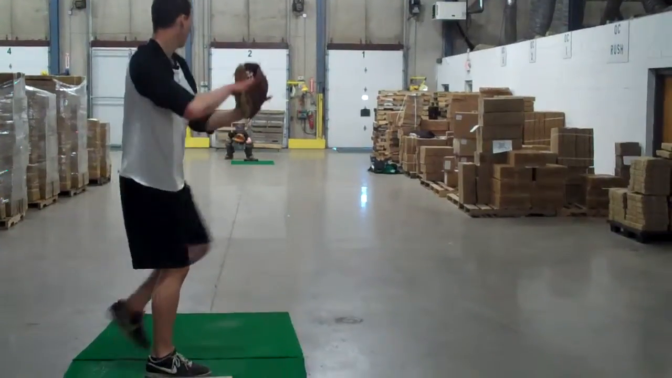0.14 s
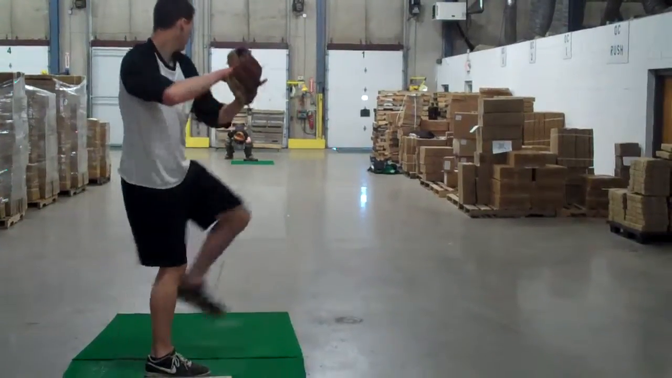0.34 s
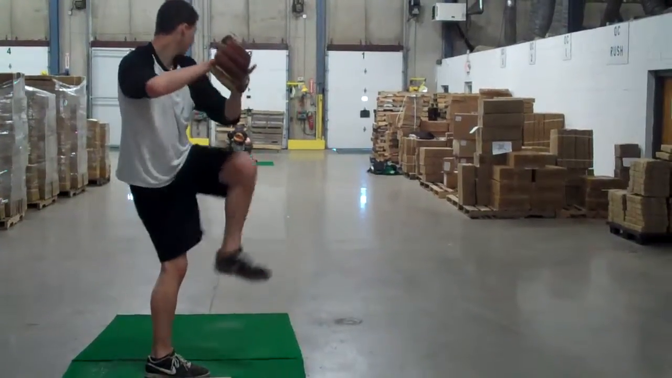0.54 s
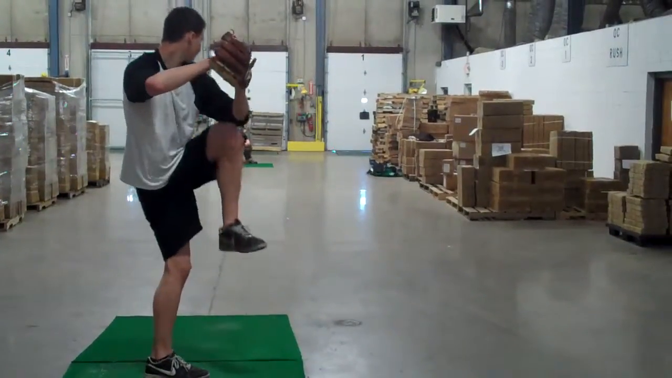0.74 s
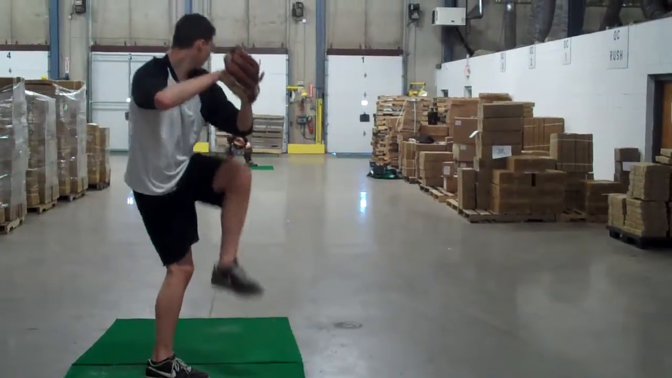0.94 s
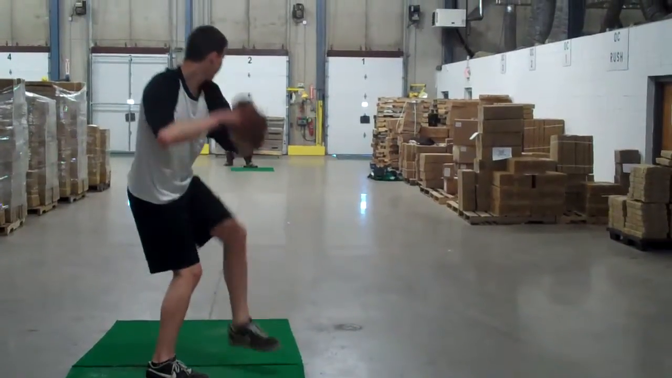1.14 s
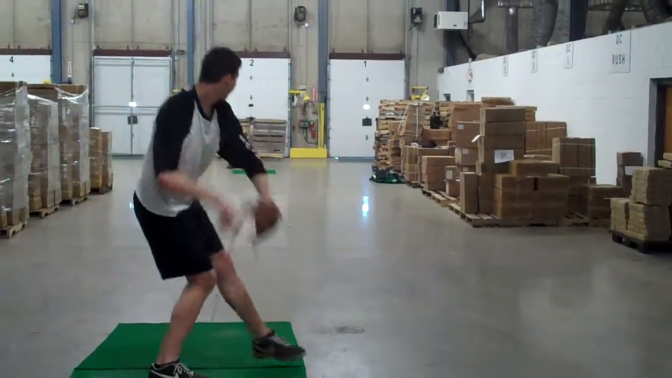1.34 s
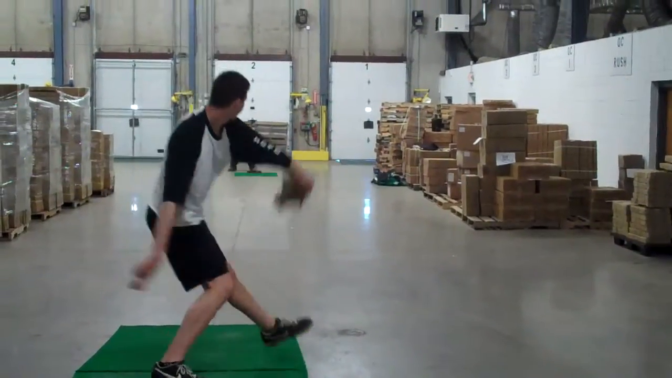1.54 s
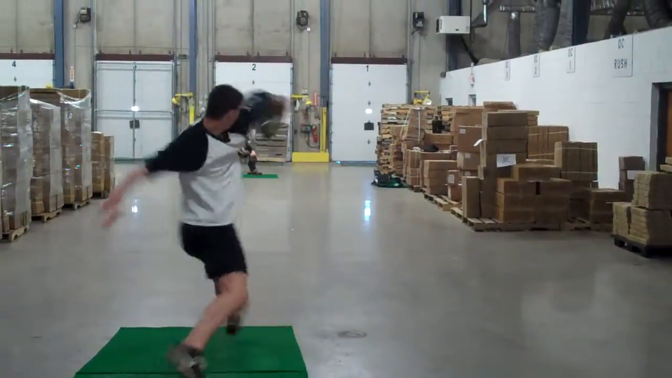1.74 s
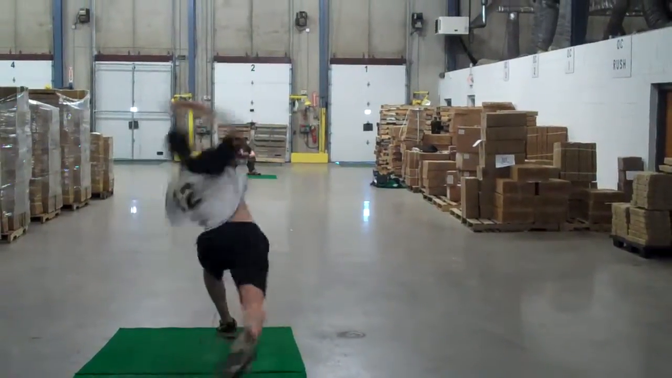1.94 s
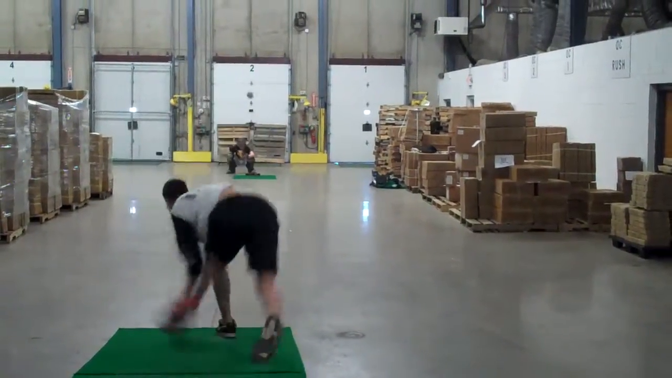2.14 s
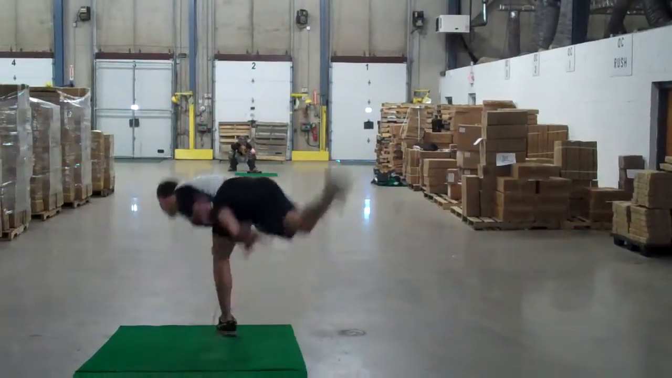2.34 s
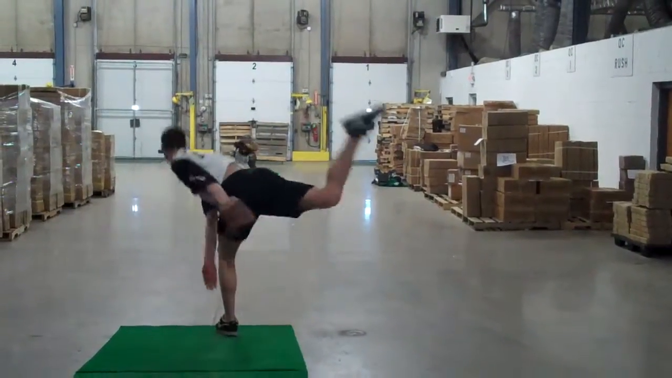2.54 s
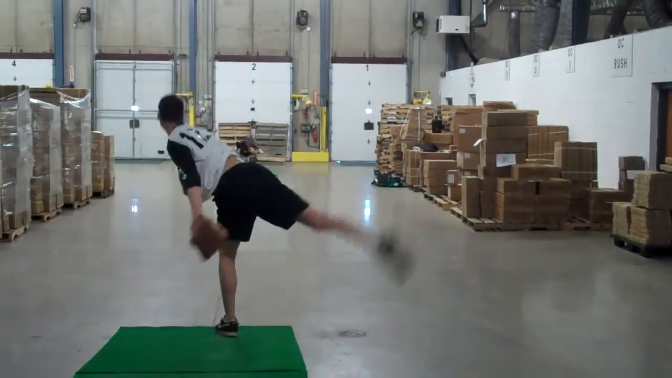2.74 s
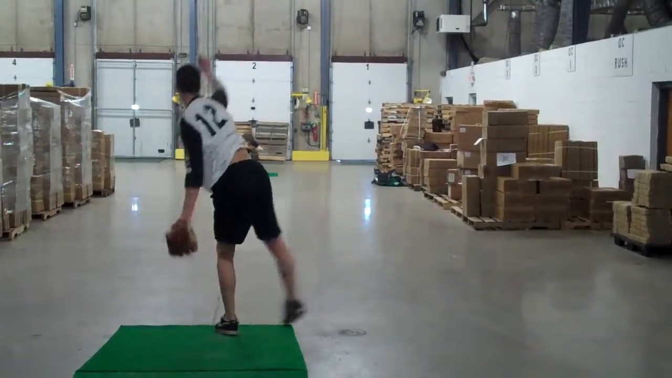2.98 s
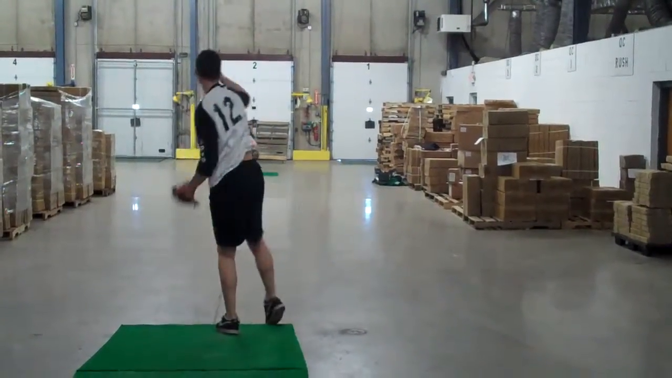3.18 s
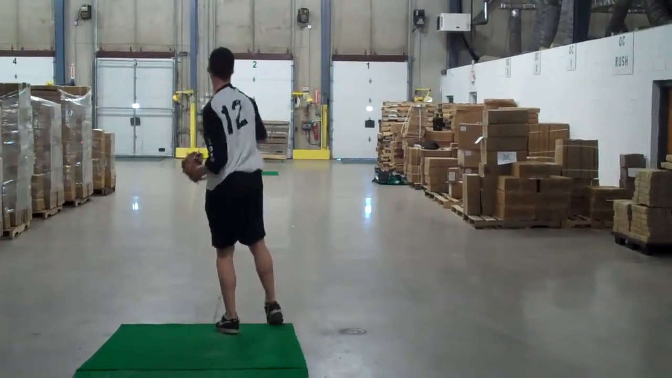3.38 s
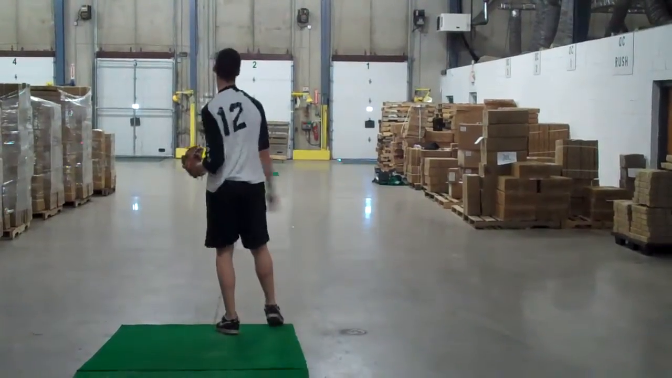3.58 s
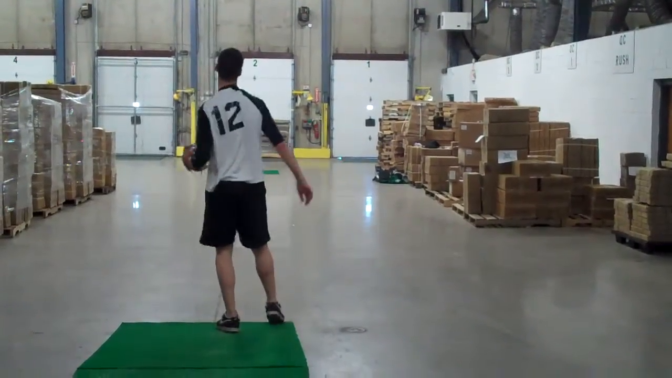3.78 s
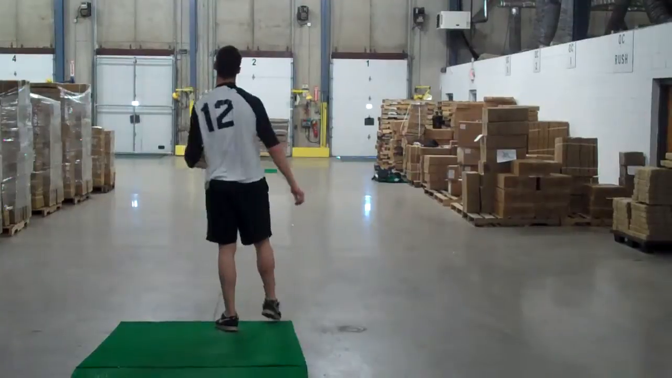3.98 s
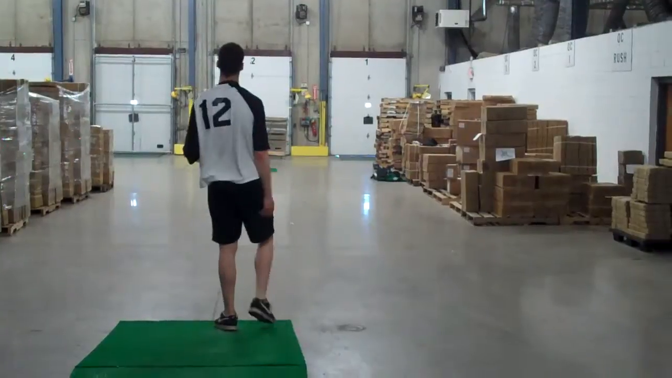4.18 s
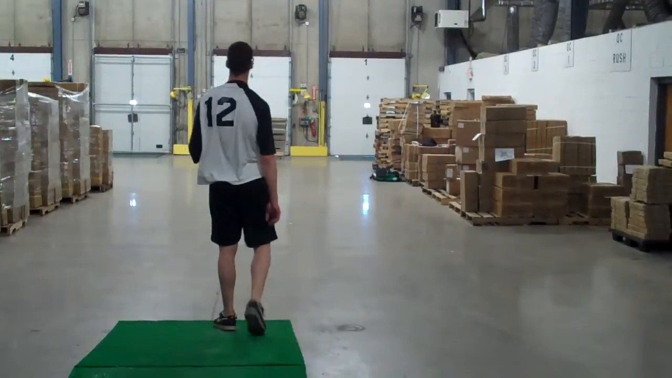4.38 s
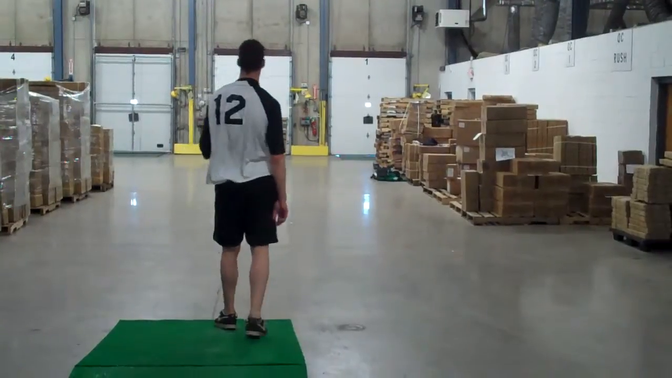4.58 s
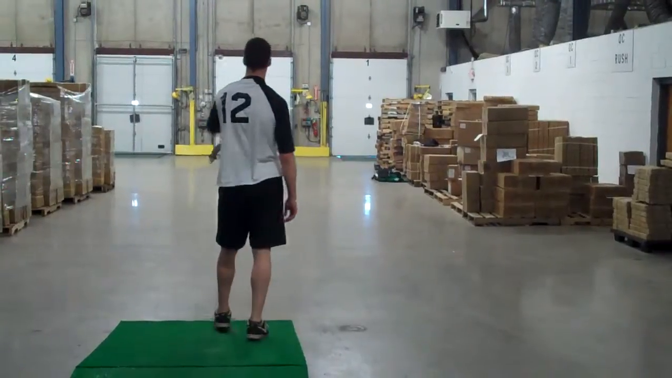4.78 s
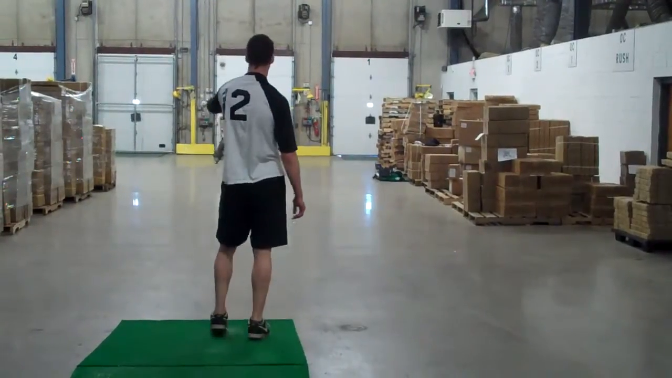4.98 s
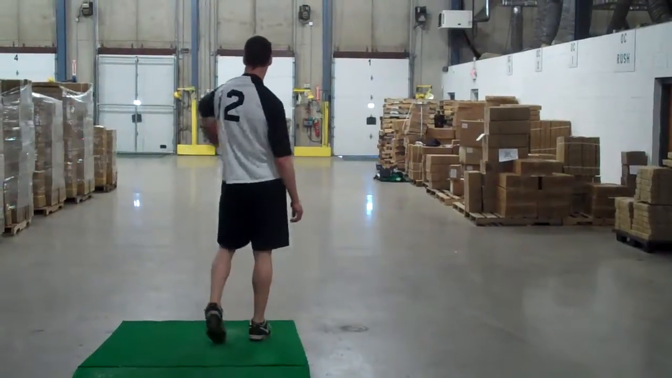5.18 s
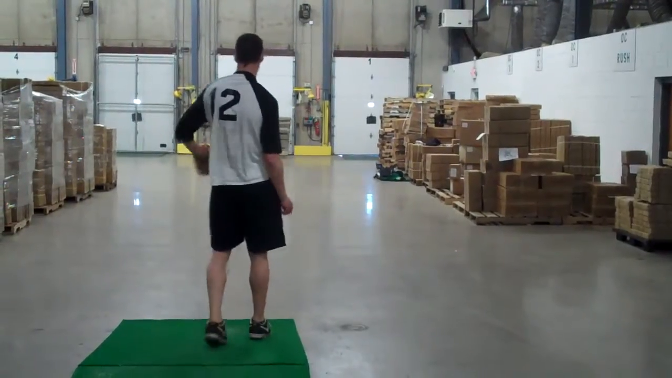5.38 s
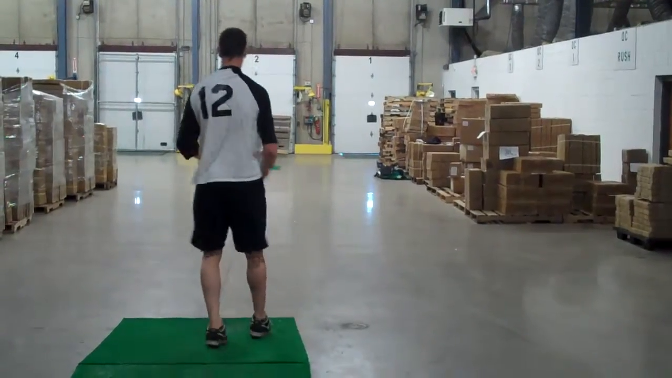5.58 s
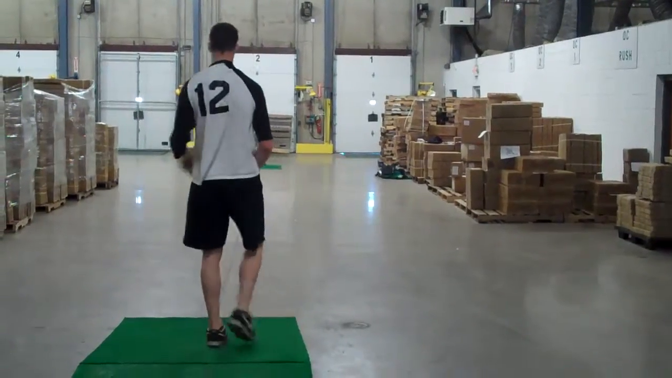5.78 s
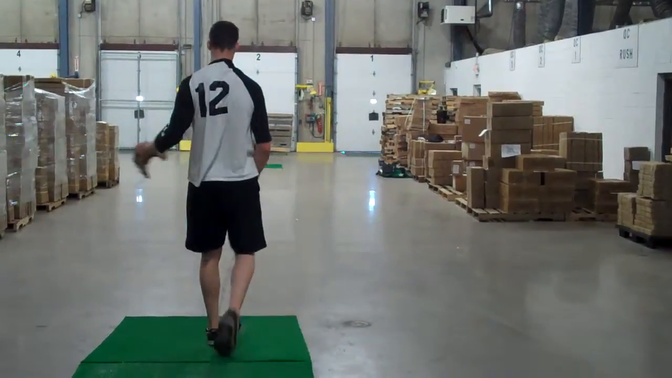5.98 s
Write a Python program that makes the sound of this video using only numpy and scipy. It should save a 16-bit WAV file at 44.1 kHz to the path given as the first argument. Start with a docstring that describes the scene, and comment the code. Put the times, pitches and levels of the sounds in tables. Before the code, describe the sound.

Quiet room hum and duct air, heard on a simple microphone near a thrower. A few small taps and tiny metallic clinks, then a quick burst of rustling clothes, dragging soles and a soft hollow footfall. Almost a second later comes a sharp, overloaded leather pop with thick hall reverberation. The background dips briefly and returns; finally a second, gentler glove slap echoes, ending with a dull step.

```python
"""In a large warehouse a pitcher throws from a portable mound: clothes swish, soles scuff, the stride thumps.
The ball pops into the catcher's mitt, loud enough to overload the microphone; the return smacks into his own glove.
Leather is damped sines plus a noise crack. Floor, stacked boxes and walls return echoes, and the hall rings on
as noise dying band by band. Light taps and clinks are close; mains hum and ventilation lie behind."""
import sys
import numpy as np
from scipy import signal
from scipy.fft import rfft, irfft, next_fast_len
from scipy.io import wavfile

SR = 44100
rng = np.random.default_rng(int(sys.argv[2]) if len(sys.argv) > 2 else 0)


def log_audio(samples):
    """Write samples as a 16-bit WAV file to the path given in sys.argv[1]."""
    # one column per channel
    frames = np.atleast_2d(samples).T
    # limit to full scale, then quantise
    limited = np.clip(frames, -1, 1)
    pcm = np.round(limited * 32767).astype(np.int16)
    wavfile.write(sys.argv[1], SR, pcm)


N = 265477


def pops():
    """Pitch into the mitt, return into the glove; pallets behind the catcher answer the mitt at once, the glove late."""
    # leather pocket resonances: pitch_hz, level_db (relative), t60_s
    mitt_modes = [(79.5, -22, 0.1), (277, -17, 0.034), (483, -9.5, 0.0077), (1027, 1.5, 0.013),
                  (2960, -6.5, .006), (4020, -3.5, 0.01), (7530, -8, 0.0032)]
    glove_modes = [(404, -35, 0.026), (580, -16.5, 0.025), (857, -9, 0.033), (1410, -21, 0.012),
                   (3560, -21, 0.018), (5500, -30, 0.0059)]
    # colour of the leather's crack: frequency_hz, level_db (relative, per Hz)
    mitt_crack = [(88, -40), (150, -7), (431, -9.5), (1040, -6), (1210, -11), (1500, -2), (1830, -16.5),
                  (3160, -7), (6260, -19.5), (7180, -22), (12700, -40), (16000, -56)]
    glove_crack = [(150, -32), (250, -10), (968, -2.5), (2360, -4.5), (3940, -2.5), (4370, -4.5),
                   (7060, -16), (7690, -15), (11800, -25), (15000, -67)]
    # colour of what the hall gives back: frequency_hz, level_db (relative, per Hz)
    mitt_hall = [(100, -33), (190, -11.5), (250, -3.5), (390, -1), (680, -8.5), (960, -3.5), (1400, -4.5),
                 (1750, -8), (2200, -4.5), (3000, -10), (4100, -9.5), (6500, -18), (10500, -31),
                 (13500, -71)]
    glove_hall = [(120, -45), (200, -11.5), (329, -19), (373, -8), (504, -8.5), (561, 0), (707, 0),
                  (956, -2), (1160, -10.5), (1780, -2), (2020, -12.5), (2410, -6), (3890, -8.5),
                  (8980, -23), (14000, -47)]
    # echoes off floor, boxes and walls: delay_s, level_db, roughness of the face (0-1)
    mitt_echoes = [(.0072, -1, .9), (0.011, -2, 0.5), (.0145, 0.5, 0.47), (0.0358, -7, 0.08), (.045, -1, 0),
                   (.0702, -10.5, 0.01), (.52, -30.5, 0.3)]
    glove_echoes = [(.0195, 2.5, 0.01), (.032, -6, .02), (.076, -10, .03), (.1473, -5.5, 0.043)]

    pitch = catch(2.8658, mitt_echoes, mitt_modes, mitt_crack, pocket_db=1.5, crack_db=-4, crack_t60=0.018,
                  sink_s=.0002, bass_hz=116, echo_bass_hz=440, spread=0.41)
    pitch += wash(2.8785, mitt_crack, level_db=-10.0, t60=0.092, bass_hz=800, edge_hz=10000)
    pitch += reverberation(2.876, mitt_hall, level_db=-21, build_s=.005,
                           aisle_db=3, aisle_t60=0.82, clump_db=1.52)
    back = catch(5.3362, glove_echoes, glove_modes, glove_crack, pocket_db=-5.5, crack_db=-10, crack_t60=0.035,
                 sink_s=.0016, bass_hz=400, echo_bass_hz=380, spread=.45)
    back += wash(5.4755, glove_crack, level_db=-23, t60=0.55, bass_hz=330, edge_hz=4000)
    back += reverberation(5.353, glove_hall, level_db=-25.0, build_s=0.0015,
                          aisle_db=-2, aisle_t60=1.0, clump_db=1.0)
    return pitch + back


def catch(s, echoes, pocket, crack, pocket_db, crack_db, crack_t60, sink_s, bass_hz, echo_bass_hz, spread):
    """Leather cracks, the ball sinks in, the pocket rings; flat faces return the ring, rough ones scatter the crack."""
    # the longer its way, the duller and more smeared an echo; far_s is the delay over which this sets in
    far_s, near_edge_hz, far_edge_hz, smear_s = 0.023, 10000, 3500, 0.061
    out, t = np.zeros((2, N)), np.arange(SR // 4) / SR
    thud = ring(pocket, t)
    slap = noise(crack, len(t), spread) * dying(t, crack_t60)
    add(out, s, from_db(crack_db) * thin(dull(slap, near_edge_hz), bass_hz))
    add(out, s + sink_s, from_db(pocket_db) * thin(thud, bass_hz))
    for delay, db, rough in echoes:
        far = 1 - np.exp(-delay / far_s)
        scattered = noise(crack, len(t), spread) * dying(t, crack_t60 + smear_s * far ** 2)
        echo = np.sqrt(1 - rough) * thud + np.sqrt(rough) * scattered
        echo = thin(echo, echo_bass_hz)   # small faces reflect little bass
        edge_hz = near_edge_hz * (far_edge_hz / near_edge_hz) ** far
        add(out, s + delay, from_db(db) * dull(echo, edge_hz))
    return out


def wash(s, crack, level_db, t60, bass_hz, edge_hz):
    """A stack of pallets scatters the crack into a dense, decaying wash."""
    out, t = np.zeros((2, N)), np.arange(SR // 2) / SR
    scattered = noise(crack, len(t), spread=0.48) * dying(t, t60)
    add(out, s, from_db(level_db) * thin(dull(scattered, edge_hz), bass_hz))
    return out


def reverberation(s, spectrum, level_db, build_s, aisle_db, aisle_t60, clump_db):
    """Dense scatter from the nearby boxes fades fast and leaves the slow tail of the whole hall."""
    out, tail = np.zeros((2, N)), hall_tail(spectrum)
    t = np.arange(tail.shape[1]) / SR
    tail *= uneven(len(t), clump_db, rate_hz=70)   # reflections arrive in clumps
    build_up = 1 - np.exp(-t / build_s)
    aisle = 1 + from_db(aisle_db) * dying(t, aisle_t60)
    add(out, s, from_db(level_db) * tail * build_up * aisle)
    return out


def hall_tail(spectrum, size=2 ** 17, count=16):
    """Diffuse sound dying band by band, each at its own rate: the air takes the treble."""
    # how long the hall rings: frequency_hz, t60_s
    hall_t60 = [(120, 3.25), (250, 1.18), (500, 2), (1000, 2.49), (2000, 2.11), (4000, 1.43), (6500, 0.66),
                (12000, 0.51)]
    t, hz = np.arange(size) / SR, np.arange(size // 2 + 1) * SR / size
    field = rfft(noise(spectrum, size))
    centres = np.geomspace(100, 14000, count)
    # neighbouring bands crossfade, so their shares add up to one
    return sum(irfft(field * np.interp(hz, centres, share)) * dying(t, at_hz(hall_t60, centre))
               for centre, share in zip(centres, np.eye(count)))


def pitcher(wet_db=-12.02):
    """The small sounds of the throw and a faint, rough, distant squeak, with their share of the hall."""
    # the squeak's noise bands: pitch_hz, width_hz, level_db
    squeak = [(1490, 240, -54.5), (1920, 280, -53), (2520, 1100, -58)]
    dry = knocks() + rubbing()
    dry += swell(4.865, 0.067) * sum(from_db(db) * tone(hz, width) for hz, width, db in squeak)
    hall = hall_tail([(100, -3.5), (1500, 0), (5000, -5), (12000, -17)])
    hall *= from_db(wet_db) / np.sqrt(np.sum(hall[0] ** 2))   # level set by the left channel's energy
    return dry + signal.fftconvolve(dry.mean(axis=0)[None], hall, axes=1)[:, :N]


def knocks():
    """Light contacts, ringing metal and thumps on the hollow mound, and a dull step on the way back."""
    # light taps of ball, glove and shoes: start_s, level_db
    tap_times = [(.9048, -32.5), (1.0678, -45.5), (1.22, -48.5), (1.9138, -41), (1.9507, -35),
                 (1.9765, -36), (2.2226, -38.5), (3.9106, -47), (4.742, -44)]
    # a small metal thing, perhaps a necklace: start_s, level_db
    clinks = [(1.39, -55), (1.951, -50), (1.98, -41), (2.406, -57), (2.47, -54.5)]
    # its resonances: pitch_hz, level_db (relative), t60_s
    clink_modes = [(2760, 1, 0.19), (5180, 5, 0.044), (8500, 0.5, .045), (10000, -11, .06),
                   (12700, -9, .04)]
    # feet load the mound, heel low and toe higher: start_s, level_db, push_centre_hz
    footfalls = [(1.976, -33.5, 95), (2.085, -37.5, 99), (2.27, -34, 216)]
    # resonances of the hollow mound: pitch_hz, level_db (relative), t60_s
    mound = [(101, 0, 0.34), (168, 0, 0.27), (227.5, -5, 0.24), (306, -0.5, 0.13)]
    push_octaves, sole_s = 0.7, 0.0046   # breadth of a push; time over which a sole loads the board

    out, t = np.zeros((2, N)), np.arange(SR // 2) / SR
    for s, db in tap_times:
        t60 = 0.048 * 2 ** ((db + 29.5) / 16)   # a harder tap lasts longer: twice as long per 16 dB
        add(out, s, tap(db, t60, edge_hz=11500))
        add(out, s + .029, tap(db - 7.5, t60=0.1, edge_hz=2500))   # dull clatter off the boxes
    for s, db in clinks:
        edge_hz = 10000 * 2 ** ((db + 41.5) / 11)   # a harder clink is brighter: an octave per 11 dB
        add(out, s, from_db(db) * dull(ring(clink_modes, t), edge_hz))
    for s, db, push_hz in footfalls:
        board = sum(ring([mode], t) / (1 + (np.log2(mode[0] / push_hz) / push_octaves) ** 4)
                    for mode in mound)
        add(out, s, from_db(db) * board * (1 - np.exp(-t / sole_s)))   # a soft sole loads it gradually
    add(out, 5.9975, tap(db=-30.5, t60=.038, edge_hz=1900))
    return out


def tap(db, t60, edge_hz):
    """A brief contact of leather or rubber: a decaying burst of coloured noise."""
    # its colour: frequency_hz, level_db (relative, per Hz)
    tap_colour = [(150, -30), (330, 3.5), (800, -12.5), (1500, 2), (2700, -8.5), (3700, -1.5),
                  (4400, -10.5), (5400, -5.5), (8000, -22.5), (11000, -25.5), (15000, -30)]
    t = np.arange(SR // 4) / SR
    return from_db(db) * dull(noise(tap_colour, len(t), spread=0.4) * dying(t, t60), edge_hz)


def rubbing(grain_db=1.6, grain_hz=120, judder_db=-4.5):
    """Soles drag on the turf and cloth slides; each move swells and fades, catching and slipping unevenly."""
    # soles drag and judder, lower as they slow: centre_s, level_db, half_length_s, judder_hz, fall_octaves_per_s
    scuffs = [(2.087, -42, 0.065, 429.7, 3), (2.259, -42.5, 0.053, 380, 19)]
    # cloth moving with the body: centre_s, level_db, half_length_s
    swishes = [(.093, -59.5, 0.081), (1.997, -52.5, 0.027), (2.09, -47, 0.09), (2.248, -48, 0.047),
               (2.363, -55, .09), (2.538, -57, 0.062), (4.553, -60, 0.083), (4.74, -59.5, 0.14)]
    # colours of turf and of cloth: frequency_hz, level_db (relative, per Hz)
    turf_colour = [(120, -14), (200, 5.5), (323, -10.5), (503, -7), (553, -3), (1970, -10.5), (2790, -13),
                   (3500, -28), (4550, -49), (7700, -120)]
    cloth_colour = [(1180, -26.5), (2000, -4), (2790, -1.5), (3420, -2), (8050, -8), (9630, -11.5),
                    (14000, -31)]
    grit = noise(turf_colour, N, spread=.7)
    soles = sum(from_db(db) * swell(s, length) * (grit + from_db(judder_db) * judder(s, hz, fall))
                for s, db, length, hz, fall in scuffs)
    moves = sum(from_db(db) * swell(s, length) for s, db, length in swishes)
    cloth = moves * noise(cloth_colour, N, spread=0.8)
    return uneven(N, grain_db, grain_hz) * (soles + cloth)


def judder(s, hz, fall):
    """Rough stick and slip whose rate falls as the sole slows around time s; rms 1."""
    rate = hz * 2 ** (-fall * np.clip(np.arange(N) / SR - s, -.1, .1))
    roughness = dull(rng.standard_normal(N), 65)
    return rms_one(roughness * np.sin(2 * np.pi * np.cumsum(rate) / SR))


def building(air_db=-52, drone_db=-55):
    """Transformers hum, fans drone and whine faintly, and air rushes through the ducts."""
    # mains hum and fan tones: pitch_hz, level_db (rms), waver_hz
    hum_lines = [(118.7, -56, 0.8), (365, -85, 1), (860, -78, 2), (1338, -71, 1.1), (1923, -68, 2.55),
                 (2510, -83, 2.4), (7900, -83, 20)]
    # colour of the air in the ducts: frequency_hz, level_db (relative, per Hz)
    air_colour = [(20, -5), (45, -10), (90, -3.5), (150, -5), (210, -12.5), (500, -15), (1000, -17.5),
                  (1500, -20), (2000, -22), (3500, -24), (5600, -26), (10000, -37.5), (12500, -44.5),
                  (15000, -64)]
    lines = sum(from_db(db) * whine(hz, waver) for hz, db, waver in hum_lines)
    drone = from_db(drone_db) * tone(hz=121.2, width_hz=22)
    return lines + drone + from_db(air_db) * noise(air_colour, N)


def whine(hz, waver_hz):
    """A steady tone whose pitch wanders a little, rms 1."""
    pitch = hz + waver_hz * rms_one(dull(rng.standard_normal(N), 12))
    return np.sqrt(2) * np.sin(2 * np.pi * np.cumsum(pitch) / SR)


def noise(spectrum, size, spread=1):
    """Coloured stereo noise, rms 1; spread 1 comes from all around, 0 from straight ahead."""
    # how alike diffuse sound is left and right: frequency_hz, likeness (0-1)
    likeness = [(30, 0.98), (130, 1), (500, 0.92), (1000, 0.87), (2000, 0.64), (4000, 0.25), (9000, 0.039)]
    padded = next_fast_len(size)
    hz = np.arange(padded // 2 + 1) * SR / padded
    mid, side = rfft(rng.standard_normal((2, padded))) * from_db(at_hz(spectrum, hz))
    alike = np.clip(1 - spread * (1 - at_hz(likeness, hz)), 0, 1)
    stereo = np.sqrt(1 + alike) * mid + np.sqrt(1 - alike) * side * [[1], [-1]]
    return rms_one(irfft(stereo, padded)[:, :size])


def tone(hz, width_hz):
    """Noise in one resonance, rms 1."""
    padded = next_fast_len(N)
    offset = (np.arange(padded // 2 + 1) * SR / padded - hz) / width_hz
    band = rfft(rng.standard_normal(padded)) / (1 + (2 * offset) ** 4)
    return rms_one(irfft(band, padded)[:N])


def ring(modes, t):
    """Damped sines after one blow."""
    return sum(from_db(db) * np.sin(2 * np.pi * hz * t) * dying(t, t60) for hz, db, t60 in modes)


def dying(t, t60):
    """A decay of 60 dB in t60 seconds."""
    return np.exp(-np.log(1000) * t / t60)


def swell(s, length):
    """A smooth rise and fall around time s, down to 1/e at length seconds either side."""
    return np.exp(-((np.arange(N) / SR - s) / length) ** 2)


def uneven(size, depth_db, rate_hz):
    """A randomly rising and falling gain, rms 1."""
    return rms_one(from_db(depth_db * rms_one(dull(rng.standard_normal(size), rate_hz))))


def dull(x, edge_hz):
    """Take the treble away."""
    return signal.sosfilt(signal.butter(2, edge_hz, fs=SR, output="sos"), x)


def thin(x, edge_hz):
    """Take the bass away."""
    return signal.sosfilt(signal.butter(2, edge_hz, "high", fs=SR, output="sos"), x)


def add(out, s, sound):
    """Mix a sound in from time s."""
    start = round(s * SR)
    out[:, start:start + sound.shape[-1]] += sound[..., :N - start]


def at_hz(points, hz):
    """Read a table on a log-frequency axis."""
    table_hz, values = np.array(points).T
    return np.interp(np.log(hz + 1e-9), np.log(table_hz), values)


def from_db(db):
    """Decibels to amplitude."""
    return 10 ** (np.asarray(db) / 20)


def rms_one(x):
    """Scale to an rms of 1."""
    return x / np.sqrt(np.mean(x ** 2) + 1e-20)


def scene(left_db=0.68):
    """Everything at the microphone, leaning slightly to the left."""
    return (pops() + pitcher() + building()) * from_db([[left_db], [-left_db]])


def record(dry, threshold_db=-9, squeeze=0.28, release_db_per_s=14, attack_s=0.014, cutoff_hz=16300):
    """Gain control ducks after a loud peak and recovers slowly; the first peaks clip; the top is cut."""
    fall = release_db_per_s * np.arange(N) / SR   # how fast the held excess, before the squeeze, is let go
    peak = np.minimum(np.abs(dry).max(axis=0), 1)
    over = np.maximum(20 * np.log10(peak + 1e-9) - threshold_db, 0)
    held = np.maximum.accumulate(over + fall) - fall
    r = np.exp(-1 / (attack_s * SR))
    ducked = dry * from_db(-squeeze * signal.lfilter([1 - r], [1, -r], held))
    return signal.sosfilt(signal.cheby2(12, 70, cutoff_hz, fs=SR, output="sos"), np.clip(ducked, -1, 1))


dry = scene()
out = record(dry)
log_audio(out)
```